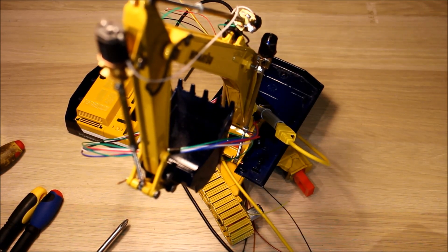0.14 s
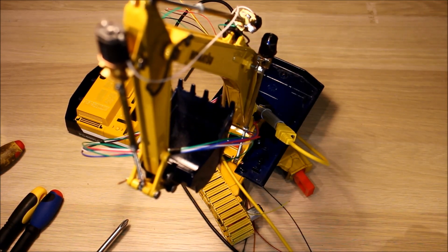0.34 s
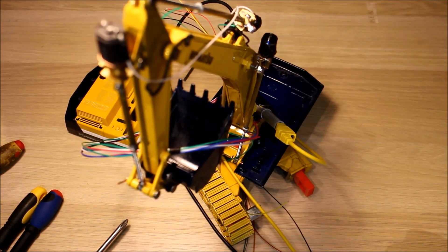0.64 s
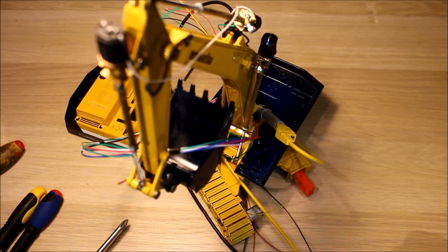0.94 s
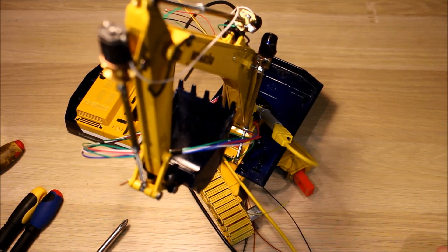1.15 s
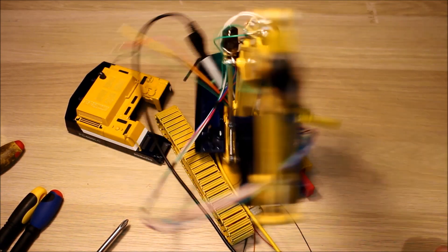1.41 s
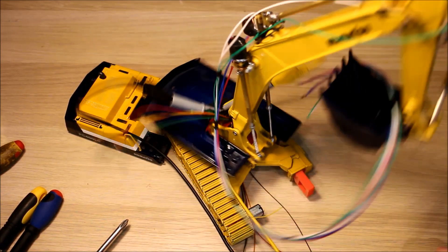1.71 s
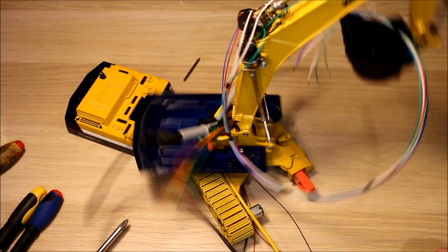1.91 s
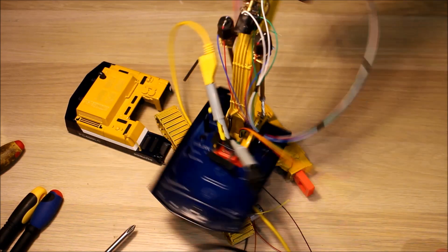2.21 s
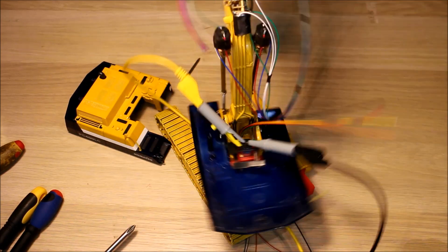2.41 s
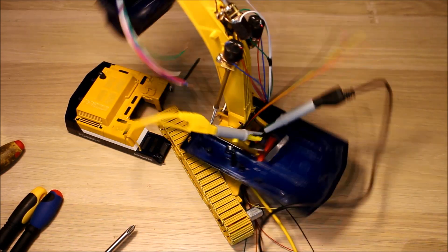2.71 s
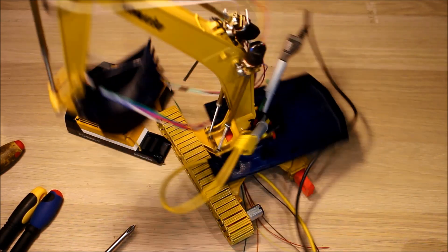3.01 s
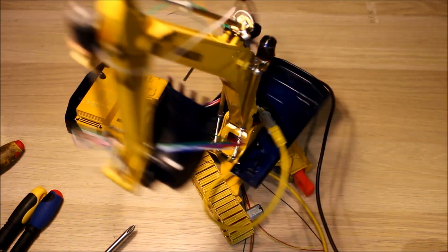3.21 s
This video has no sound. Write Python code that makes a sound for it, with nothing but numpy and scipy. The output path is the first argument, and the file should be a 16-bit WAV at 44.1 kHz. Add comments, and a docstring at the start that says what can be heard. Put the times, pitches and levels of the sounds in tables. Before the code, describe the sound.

A few plastic clicks, a dull double bump on the table and soft scuffs, then a small gear motor twitches and whirs steadily with rattling gears and sizzling brushes, close-miked in a small quiet room.

```python
"""On a wooden table in a small quiet room, the microphone close by: faint room tone lies under everything.
First come a few plastic clicks, with a dull double bump on the table among them and two soft scuffs.
After a second the gear motor of a model excavator gives one short twitch, then runs for two seconds:
gear teeth rattle and brushes sizzle as dense tiny impacts, the chassis drones in its resonances,
housing resonances whine and fade, and the turntable ticks and gears snap as filtered noise bursts."""
import sys
import numpy as np
from scipy import signal
from scipy.fft import rfft, irfft, next_fast_len
from scipy.io import wavfile
from scipy.ndimage import map_coordinates

SR = 44100
rng = np.random.default_rng(int(sys.argv[2]) if len(sys.argv) > 2 else 0)


def persist_wave(psi):
    """Save psi, clipped to +-1, as 16-bit WAV."""
    counts = np.round(np.clip(psi, -1, 1) * 32767).astype(np.int16)
    wavfile.write(sys.argv[1], SR, np.atleast_2d(counts).T)


N = 147735  # length in samples


def amp(db):
    """Decibels to gain."""
    return 10 ** (np.asarray(db) / 20)


def unit(x):
    """Scale to rms 1."""
    return x / np.sqrt(np.mean(x ** 2) + 1e-20)


def along(points, hz):
    """Interpolate (f, value) points on a logarithmic frequency axis."""
    f, value = np.transpose(points)
    return np.interp(np.log(hz + 1), np.log(f + 1), value)


def gains(rows):
    """One gain per sample for each dB column, next to silent outside the rows."""
    s, *columns = np.transpose(rows)
    t = np.arange(N) / SR
    return np.array([amp(np.interp(t, s, db, left=-120, right=min(db[-1], -90))) for db in columns])


def wobble(rate):
    """A smooth random curve through rate random knots a second."""
    knots = rng.standard_normal(int(N * rate / SR) + 4)
    return map_coordinates(knots, [np.arange(N) * rate / SR])


def since(s):
    """Seconds since s, zero before."""
    return np.maximum(np.arange(N) / SR - s, 0)


def burst(s, rise, t60):
    """An envelope that rises at s and dies away by 60 dB in t60 seconds."""
    return (1 - np.exp(-since(s) / rise)) * amp(-60 * since(s) / t60)


def filtered(x, response):
    """Multiply the spectrum of x by a response of frequency."""
    m = next_fast_len(N + SR // 2)  # spare length keeps the filter from wrapping round
    return irfft(rfft(x, m) * response(np.fft.rfftfreq(m, 1 / SR)), m)[..., :N]


def resonances(rows):
    """The summed response of (f, width, dB) resonances with alternating sign."""
    def response(f):
        total = 0
        for k, (centre, width, db) in enumerate(rows):
            damping = 1j * f * width
            total = total + (-1) ** k * amp(db) * damping / (centre * centre - f * f + damping)
        return total
    return response


def colour(points):
    """The response of (f, dB) points."""
    return lambda hz: amp(along(points, hz))


# left-right likeness of the close sources: f/Hz, likeness (-1 to 1)
SOURCE_LIKENESS = [(60,0.8),(700,0.94),(2500,0.92),(6000,0.96),(9000,0.87),(11500,-0.36)]


def stereo(pair, response, likeness=SOURCE_LIKENESS):
    """Two unrelated drives, mixed as middle and side, become a coloured left and right of rms 1."""
    def mid_side(hz):
        angle = np.arccos(np.clip(along(likeness, hz), -1, 1)) / 2
        return response(hz) * np.array([np.cos(angle), np.sin(angle)])
    mid, side = filtered(pair, mid_side)
    return unit(np.array([mid + side, mid - side]))


def noise(response, likeness=SOURCE_LIKENESS):
    """Coloured stereo noise of rms 1."""
    return stereo(rng.standard_normal((2, N)), response, likeness)


def band(hz, width):
    """Stereo noise of rms 1 in one resonance, squared for steep skirts."""
    return noise(lambda f: resonances([(hz, width, 0)])(f) ** 2)


# spectrum of the quiet room: f/Hz, relative level/dB per Hz
ROOM_TONE_COLOUR = [(20,-14),(55,-3),(450,-0.5),(1100,-3),(3300,-11),(5500,-17),(15500,-21)]
# left-right likeness of the room tone: f/Hz, likeness (-1 to 1)
ROOM_TONE_LIKENESS = [(1600,-0.51),(8000,-0.068)]
ROOM_TONE_DB = -55


def room_tone():
    """The steady hush of the place: wide, coloured noise."""
    return amp(ROOM_TONE_DB) * noise(colour(ROOM_TONE_COLOUR), ROOM_TONE_LIKENESS)


# decay of the small room: f/Hz, t60/s
ROOM_DECAY = [(100,0.38),(4000,0.32),(14000,0.18)]
ROOM_SIDE = 0.47  # width of the tail: side over middle


def room(x):
    """A short diffuse tail of decaying noise, partly different at left and right."""
    hz, t, z = signal.stft(rng.standard_normal((2, SR // 2)), SR, nperseg=256)
    decay = amp(-60 * t / along(ROOM_DECAY, hz)[:, None])
    mid, side = signal.istft(z * decay, SR, nperseg=256)[1]
    tail = np.array([mid + ROOM_SIDE * side, mid - ROOM_SIDE * side]) / np.linalg.norm(mid)
    delayed = np.pad(tail, ((0, 0), (SR // 200, 0)))  # the tail starts 5 ms after the direct sound
    return signal.fftconvolve(x, delayed, axes=1)[:, :N]


def ring(modes, t):
    """Damped modes of a struck body, a little different at each blow."""
    total = 0
    for k, (hz, db, t60) in enumerate(modes):
        decay = amp(db + rng.uniform(-2.1, 1) - 60 * t / t60)
        total = total + decay * np.sin(2 * np.pi * (hz + rng.normal(0, 2.5)) * t) * (-1) ** k
    return total


# the two knocks of the soft bump: t/s, level/dB
BUMP_KNOCKS = [(0.3231,-32),(.333,-38)]
# modes of the wooden table, before a small scatter: f/Hz, relative level/dB, t60/s
TABLE_MODES = [(76,-22,0.26),(151,-2.5,0.16),(252,6.5,0.017),(323,7.5,0.021),(437,-1.5,0.12),(610,2,0.014)]


def bump():
    """A dull double knock rings the modes of the table, equal at left and right."""
    knocks = sum(amp(db) * ring(TABLE_MODES, since(s)) for s, db in BUMP_KNOCKS)
    return knocks * np.ones((2, 1))


# soft scuffs of loose parts: t/s, level/dB, f/Hz, t60/s
SCUFF_EVENTS = [(.70,-46,1090,0.24),(.774,-46.5,2420,.1)]
SCUFF_RISE_S, SCUFF_WIDTH_HZ = .006, 260  # width of the resonance before it is squared


def scuffs():
    """Loose parts settle and rub, each stirring one resonance of the plastic."""
    return sum(amp(db) * burst(s, SCUFF_RISE_S, t60) * band(hz, SCUFF_WIDTH_HZ)
               for s, db, hz, t60 in SCUFF_EVENTS)


# plastic clicks: t/s, relative level/dB, dull above f/Hz
CLICK_EVENTS = [(0.197,-53.5,2200),(0.3607,-40,3020),(0.3665,-30,2660),(0.516,-40,1630),(.611,-28.5,7450),(.699,-44,4020),(.869,-35.5,826)]
# modes of the plastic, before a small scatter: f/Hz, relative level/dB, t60/s
PLASTIC_MODES = [(429.5,0,0.2),(631,-12.5,0.19),(1075,2,0.078),(1155,-10,0.18),(1274,-1,.065),(1510,-2,0.045),(2137,3.5,0.062),(2360,3,0.047),(2680,3,0.026),(3260,-10.5,0.06),(4100,2,0.024),(4800,0,0.032)]
# spectrum of the crack and rattle: f/Hz, relative level/dB
CLICK_NOISE_COLOUR = [(200,-19),(400,-4),(1300,-1),(2200,-6.5),(3500,-3.5),(5500,-10),(8000,-7.5),(10500,-5),(12000,-25)]
PLASTIC_DB = -8.0
CRACK_DB, CRACK_T60 = -6.5, 0.017  # t60 in s
RATTLE_DB, RATTLE_T60 = -8.5, 0.12
RATTLE_JOLTS_HZ, RATTLE_JOLTS_DB = 247, 3.5  # knots a second and depth of the uneven rattle
CONTACT_CYCLES = 0.68  # build-up time constant of a contact, in cycles of its dull-above frequency


def clicks():
    """Each click cracks, rattles and rings the plastic; soft contacts are duller and build up slower."""
    out = np.zeros((2, N + SR))
    t = np.arange(SR // 3) / SR
    grit = noise(colour(CLICK_NOISE_COLOUR))
    for s, db, dull_hz in CLICK_EVENTS:
        at = round(s * SR)
        jolts_db = RATTLE_JOLTS_DB * wobble(RATTLE_JOLTS_HZ)[:len(t)]
        crack = amp(CRACK_DB - 60 * t / CRACK_T60)
        rattle = amp(RATTLE_DB + jolts_db - 60 * t / RATTLE_T60)
        noisy = grit[:, at:at + len(t)] * (crack + rattle)
        build_up = 1 - np.exp(-t * dull_hz / CONTACT_CYCLES)
        struck = (amp(PLASTIC_DB) * ring(PLASTIC_MODES, t) + noisy) * build_up
        soft = signal.butter(2, min(dull_hz, SR / 3), fs=SR, output="sos")
        out[:, at:at + len(t)] += amp(db) * signal.sosfilt(soft, struck)
    return out[:, :N]


# turntable ticks: t/s, relative level/dB
TICK_EVENTS = [(1.472,-48),(1.534,-50),(1.554,-53),(1.931,-42.5),(1.958,-39),(2.016,-42.5),(2.074,-43),(2.102,-41),(2.192,-43),(2.34,-48),(2.389,-48),(2.418,-42.5),(2.483,-44),(2.582,-43.5),(2.68,-46.5),(2.846,-53),(2.951,-46),(3.001,-49)]
# hollow spectrum of a tick: f/Hz, relative level/dB
TICK_SPECTRUM = [(500,-17),(800,-5.5),(950,16),(1200,7.5),(1550,5.5),(4000,-17)]
TICK_DB = 5.5  # added to every tick
TICK_RISE_S, TICK_T60 = 0.0024, 0.087  # both in s


def turntable():
    """Short hollow ticks of noise as the ring gear catches and slips."""
    envelope = sum(amp(db + TICK_DB) * burst(s, TICK_RISE_S, TICK_T60) for s, db in TICK_EVENTS)
    return envelope * noise(colour(TICK_SPECTRUM))


# bright snaps in the gear train: t/s, level/dB, centre f/Hz
SNAP_EVENTS = [(1.117,-42,10000),(1.932,-37,3150),(2.315,-33,2400),(3.099,-30,4300)]
SNAP_T60 = .05  # s


def snaps():
    """Bright, broad snaps of noise as the gears take up their play."""
    return sum(amp(db) * burst(s, TICK_RISE_S, SNAP_T60) * band(hz, hz) for s, db, hz in SNAP_EVENTS)


# housing resonances swinging towards the microphone and away again as the model turns:
# centre t/s, half length/s, f/Hz, relative level/dB
HOUSING_RINGS = [(1.444,0.24,1524,-59),(1.678,0.28,4060,-50.5),(1.94,0.12,8370,-43),(1.994,0.065,9280,-46),(2.0,0.16,7800,-52),(2.27,0.54,2823,-49),(2.78,0.3,1448,-47),(3.056,0.19,3710,-47)]
RING_WIDTH_HZ, RING_WIDTH_SHARE = 40, 0.014  # fixed width plus a share of f, before squaring
FLUTTER_HZ, FLUTTER_DB = 36.12, 1.5  # knots a second and depth of the random flutter


def housing():
    """Each resonance of the housing whines and flutters for a while, then turns away."""
    t = np.arange(N) / SR
    total = 0
    for s, length, hz, db in HOUSING_RINGS:
        facing = np.exp(-((t - s) / length) ** 4 / 2)
        flutter = unit(amp(FLUTTER_DB * wobble(FLUTTER_HZ)))
        whine = band(hz, RING_WIDTH_HZ + RING_WIDTH_SHARE * hz)
        total = total + amp(db) * facing * flutter * whine
    return total


TEETH_PER_S, TOOTH_SCATTER_DB = 3400, 2.5  # mean rate of the tiny impacts, spread of their size


def contacts(rub):
    """Dense tiny impacts of uneven size at random moments over a bed of rubbing noise."""
    hit = rng.random((2, N)) < TEETH_PER_S / SR
    size = amp(TOOTH_SCATTER_DB * rng.standard_normal((2, N))) * rng.choice([-1, 1], (2, N))
    return unit(hit * size) + rub * rng.standard_normal((2, N))


SHIFT_DB, SHIFT_S = 3, 0.19  # peaks and dips stay within twice SHIFT_DB; one change spans about twice SHIFT_S seconds


def shifting(pair):
    """Narrow peaks and dips that slowly come and go as the sound paths change."""
    z = signal.stft(pair, nperseg=1024)[2]
    over_pitch = signal.get_window("hann", 6)
    over_time = signal.get_window("hann", int(SHIFT_S * SR / 256))
    smooth = np.outer(over_pitch, over_time)
    field = signal.fftconvolve(rng.standard_normal(z.shape[1:]), smooth, "same")
    change = amp(SHIFT_DB * 2 * np.tanh(unit(field) / 2))
    return signal.istft(z * change, nperseg=1024)[1][:, :N]


# motor running: t/s, then relative level/dB of gear rattle, brush sizzle, chassis drone
RUN_LEVELS = [(1.257,-57.5,-60,-62),(1.285,-43,-52.5,-48),(1.40,-44,-44,-53),(1.55,-41.5,-42.5,-45),(1.7,-43.5,-42,-52.5),(1.82,-42.5,-41.5,-53.5),(1.98,-42,-39.5,-45),(2.25,-42.5,-42.5,-52),(2.44,-41,-40.5,-44.5),(2.56,-42,-43.5,-50),(2.82,-43,-44,-52),(3.05,-42,-42,-48.5),(3.31,-44,-46,-52),(3.35,-60,-67,-61)]
# the short twitch before it: same columns
TWITCH_LEVELS = [(1.096,-70,-87,-73),(1.106,-51,-57.5,-61),(1.12,-45,-50.5,-53),(1.163,-52,-60,-53),(1.2,-67,-72,-55)]
# spectrum of the gear housing: f/Hz, relative level/dB per Hz
GEAR_COLOUR = [(300,-22),(560,1),(740,-12),(950,-4),(1250,-6.5),(1500,3.5),(1800,-4.5),(2400,2.5),(3300,1.5),(4200,-0.5),(4900,-3.5),(5600,-2),(6800,-6.5),(8000,-16),(12000,-35)]
# spectrum of the brushes: f/Hz, relative level/dB per Hz
BRUSH_COLOUR = [(5000,-30),(7000,-12.5),(7800,0),(8600,-1.5),(9600,-3.5),(10050,-7.5),(10700,-6),(11300,-18),(11700,-8.5),(13300,-11),(15800,-15.5)]
# resonances of the chassis on the table: f/Hz, width/Hz, relative level/dB
CHASSIS_MODES = [(65.9,5.9,-0.5),(106,22,-7),(119.7,5.7,-3),(154,17,-2.5),(285,79,-10.5),(349.4,15,2.5),(422.7,17,-1.5)]
SHAFT_HZ, SHAFT_WANDER, SHAFT_DEPTH = 136.6, 0.0346, 0.073  # nominal rate, share of rate, share of level
WHEEL_HZ, WHEEL_DEPTH = 33, 0.076  # first gear wheel, sharing the wander of the shaft
GEAR_DB, BRUSH_DB, DRONE_DB = 1.24, 2.5, 1.5  # trims added to the level columns


def motor():
    """Gears, brushes and chassis, pulsing with the shaft and the first gear wheel."""
    gear, brush, drone = gains(RUN_LEVELS) + gains(TWITCH_LEVELS)
    turning = 2 * np.pi * np.cumsum(1 + SHAFT_WANDER * wobble(4)) / SR
    shaft = 1 + SHAFT_DEPTH * np.cos(SHAFT_HZ * turning)
    wheel = 1 + WHEEL_DEPTH * np.cos(WHEEL_HZ * turning)
    load = shaft * wheel
    teeth = contacts(rub=0.65) * load * amp(1.0 * wobble(45))
    sparks = contacts(rub=0.94) * load * amp(0.89 * wobble(60))

    def chassis(f):
        return resonances(CHASSIS_MODES)(f) / (1 + (45 / (f + 1)) ** 6)  # little below 45 Hz

    rattle = amp(GEAR_DB) * gear * stereo(shifting(teeth), colour(GEAR_COLOUR))
    sizzle = amp(BRUSH_DB) * brush * stereo(shifting(sparks), colour(BRUSH_COLOUR))
    hum = amp(DRONE_DB) * drone * stereo(teeth, chassis)
    whine = gear / gear.max() * load * housing()
    return rattle + sizzle + hum + whine


CLICK_ROOM_DB, MOTOR_ROOM_DB = -9, -14.5  # sends to the room tail


def scene():
    """Handling, then the running model, with their room tail over the room tone."""
    handling = clicks() + scuffs() + bump()
    machine = motor() + turntable() + snaps()
    wet = room(amp(CLICK_ROOM_DB) * handling + amp(MOTOR_ROOM_DB) * machine)
    return handling + machine + wet + room_tone()


BASS_LEFT_DB = 2  # raises the left bass and lowers the right by as much
TOP_HZ = 15850


def record(dry):
    """At the microphone the bass leans left, and nothing is kept above the band limit."""
    def response(hz):
        lean_db = np.array([[1], [-1]]) * BASS_LEFT_DB / (1 + (hz / 250) ** 4)
        return amp(lean_db) * (hz < TOP_HZ)
    return filtered(dry, response)


dry = scene()
out = record(dry)
persist_wave(out)
```